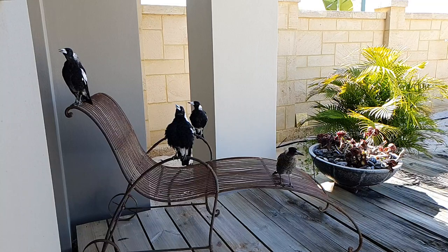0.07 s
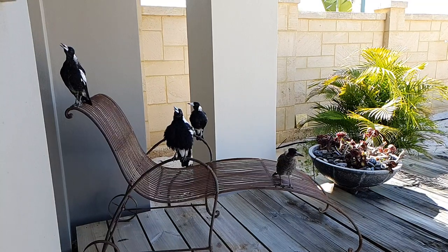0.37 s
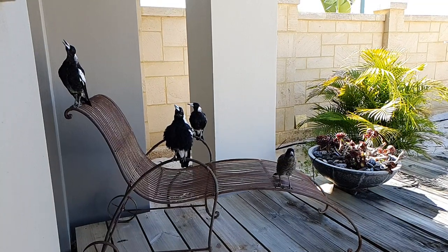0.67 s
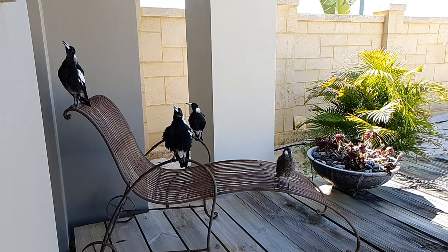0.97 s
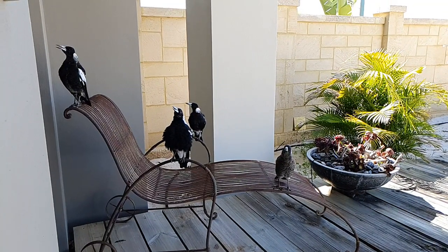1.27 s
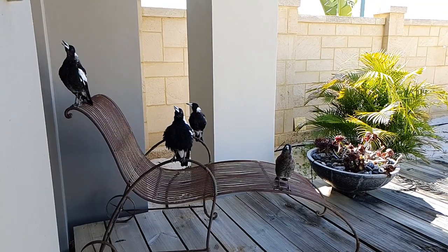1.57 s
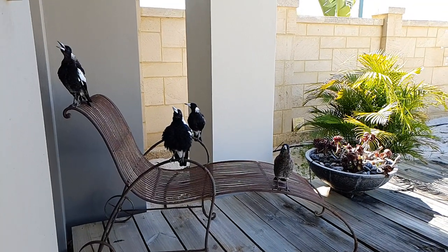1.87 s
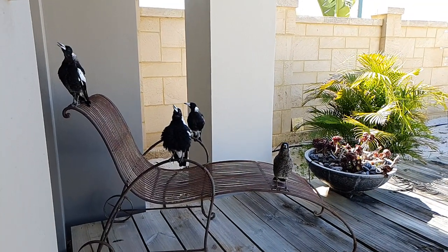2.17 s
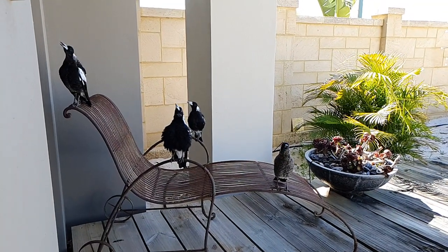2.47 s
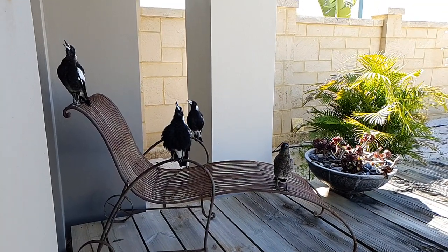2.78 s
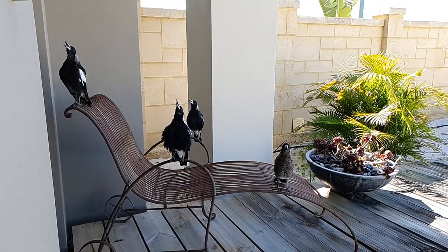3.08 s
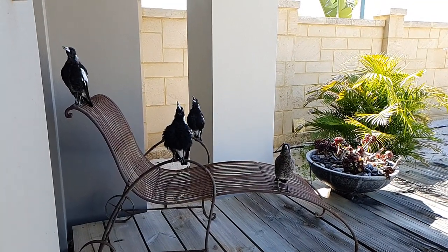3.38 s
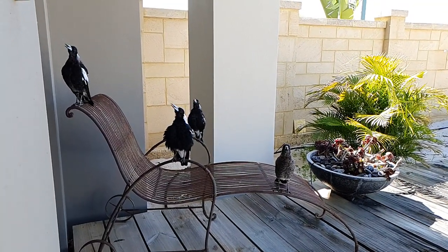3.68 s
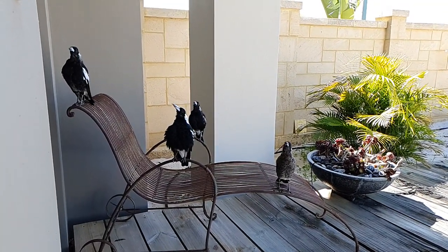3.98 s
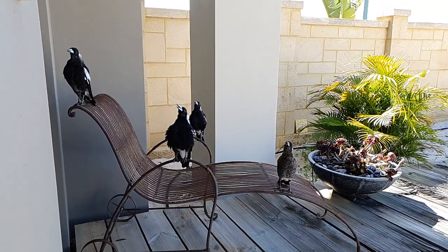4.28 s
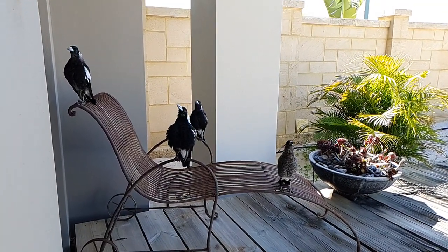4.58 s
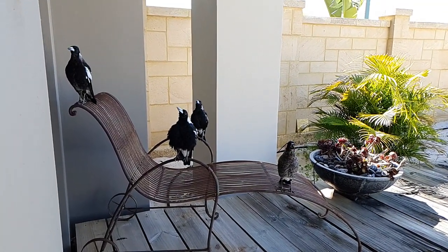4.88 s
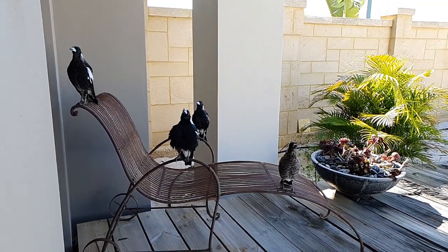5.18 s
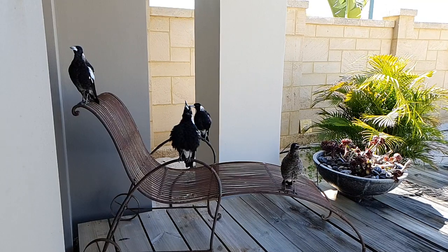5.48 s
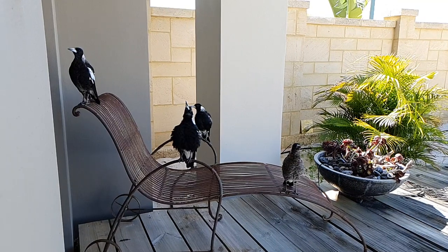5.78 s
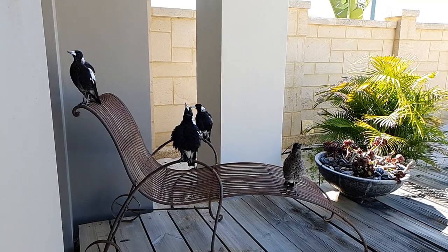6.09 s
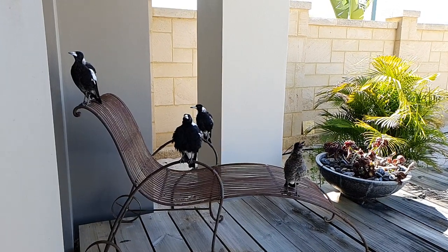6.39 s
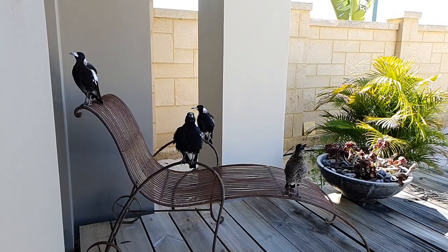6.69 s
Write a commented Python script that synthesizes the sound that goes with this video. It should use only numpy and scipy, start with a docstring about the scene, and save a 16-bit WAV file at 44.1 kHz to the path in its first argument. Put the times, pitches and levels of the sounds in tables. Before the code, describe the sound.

Three magpies warble close by outdoors, trading clear piping notes, buzzing trills and falling carols over a faint low rumble.

```python
"""Three magpies sing on a wooden deck between a house wall and pillars, over a faint outdoor rumble.
First come short clear pipes and buzzing trills: gliding whistles from the syrinx, a bird's voice box.
A soft carol slips in, holding a high tone and then falling in a trill. Near 3 s a throaty crack and
loud pipes lead into two more carols. Near 5 s the right-hand bird joins in fully; three carols follow,
and one pipe ends the song. All along, notes overlap and the deck and walls answer with quick echoes."""
import sys
import numpy as np
from scipy import signal
from scipy.fft import rfft, irfft, next_fast_len
from scipy.io import wavfile
from scipy.ndimage import uniform_filter1d, minimum_filter1d, map_coordinates

SR = 44100
rng = np.random.default_rng(int(sys.argv[2]) if len(sys.argv) > 2 else 0)


def wav_record(signal):
    """Record a signal, one row per channel, as 16-bit PCM in the file named by sys.argv[1]."""
    frames = np.transpose(np.atleast_2d(signal))
    bounded = np.clip(frames, -1, 1)
    # unit amplitude maps onto the largest positive 16-bit level
    quanta = np.round(bounded * 32767).astype(np.int16)
    wavfile.write(sys.argv[1], SR, quanta)


N = 306054
TOP_HZ = 15550  # the highest sound we keep


def magpie(bird, level_db, lead_ms, **tone):
    """One bird sings all its notes; they reach the left ear lead_ms before the right."""
    kinds = (carol, CAROL_NOTES), (trilled, TRILL_NOTES), (pipe, PIPE_NOTES)
    notes = [shape(*row[:-1]) for shape, table in kinds for row in table if row[-1] == bird]
    song = np.zeros((2, N + SR))
    for plan in notes:
        start, sound = syrinx(plan, **tone)
        song[:, start:start + sound.shape[1]] += sound
    early_s = np.array([[1], [-1]]) * lead_ms / 2000
    return amp(level_db) * filtered(song[:, :N], lambda hz: np.exp(2j * np.pi * hz * early_s))


# Carols: (start [s], hold [s], fall [s], top pitch [Hz], end pitch [Hz], glide [exponent],
# hold level [dB], hold trill [0-1], fall level [dB], loudest point of fall [0-1], fall trill [0-1],
# overtones [dB], beak opening [0-1], left over right [dB], bird [name])
CAROL_NOTES = [ (0.421, 0.2, .18, 1412, 1027, 0.23, -41.5, 0.34, -24, 0.53, 1, -26, 0.74, -6, "middle"),
               (2.926, 0.15, 0.29, 1435, 1058, 0.97, -17, 0.2, -6, 0.38, 0.81, -21.5, 0.64, -6.5, "left"),
               (3.416, 0.23, .135, 1409, 968, 0.45, -22, 0.92, -20.5, 0.25, 1, -20, 0.83, -4, "middle"),
               (5.042, .095, .18, 1312, 953.4, .5, -18.5, 0.34, -15, 0.88, 0.49, -28.5, 0.71, 0.5, "right"),
               (5.519, .255, .35, 1396, 1084, .65, -24.5, 0.44, -5.5, .4, 0.63, -19.5, 0.79, -3, "left"),
               (6.395, .095, 0.26, 1383, 1109, .85, -17.5, 0.43, -9, 0.1, .7, -17, 0.68, 0, "right"), ]

def carol(start, hold, fall, top_hz, end_hz, glide, hold_db, hold_trill,
          db, peak, trill, overtones_db, beak, pan_db):
    """Plan a bright held tone that sinks slowly, then breaks into a swelling, falling trill."""
    sag_hz_per_s, break_s = 124.7, .0212
    sag_hz = sag_hz_per_s * hold / 2
    held = breath(start, hold - break_s, top_hz + sag_hz, top_hz - sag_hz, hold_db, .2, hold_trill,
                  overtones_db + 4, beak, pan_db, swell_db=(5.5, 2), glide=1)
    falling = breath(start + hold, fall, top_hz - sag_hz, end_hz, db, peak, trill,
                     overtones_db, beak, pan_db, swell_db=(10, 15.5), glide=glide)
    return slide_in(np.vstack([held, falling]))


# Mostly buzzing notes, plus one loud, nearly clear tone with a nasal ring:
# (start [s], length [s], start pitch [Hz], end pitch [Hz], level [dB], loudest point [0-1],
# trill depth [0-1], overtones [dB], beak opening [0-1], left over right [dB], bird [name])
TRILL_NOTES = [ (0.086, 0.066, 923, 919.4, -15, 0.15, 1, -20, 0.23, -4.5, "left"),
               (0.101, 0.042, 1157, 1304, -20.5, 0.82, 0.76, -29.5, 0.4, -6, "left"),
               (0.369, 0.073, 743, 673, -32, 0.07, 1, -50, 0.1, -3.5, "middle"),
               (0.767, 0.13, 990, 823, -25, 0.77, 0.61, -23.5, 0.45, -7, "middle"),
               (1.131, 0.077, 905, 758, -21.5, 0.84, 0.86, -31, 0.7, -4, "middle"),
               (1.192, 0.15, 752, 718.4, -21, 0.86, 0.75, -34.5, .5, -3.5, "middle"),
               (1.475, 0.12, 884, 820.5, -21.5, 0.59, 0.57, -33, 1, -5.5, "middle"),
               (1.678, 0.28, 1111, 1019, -16, 0.88, 0.69, -10, 0.04, -4, "left"),
               (1.718, 0.079, 1106, 1062, -4, 0.38, 0.07, -22.5, 0, 11.5, "left"),
               (1.979, 0.062, 1333, 1355, -10.5, 0, 1, -25.5, .6, -5, "left"),
               (2.089, 0.056, 1342, 1316, -15, 0.32, 1, -27.5, 0.66, -11, "left"),
               (2.191, .12, 1124, 1057, -6.5, 0.09, 0.92, -19.5, 0.17, -4, "left"),
               (2.312, 0.17, 1065, 1055, -17.5, 0.44, 0.93, -19.5, 0.54, -7, "left"),
               (2.39, 0.29, 997, 731, -12.5, 0.63, 0.52, -22, 0.29, -3.5, "middle"),
               (3.96, 0.12, 793, 697, -23.5, 0.67, 0.7, -32.5, 0.2, -7.5, "left"),
               (4.078, .1, 724.4, 699.7, -20.5, 1, 0.9, -38.5, 0.05, -3.5, "left"),
               (4.167, .27, 827.8, 665.6, -17, 0.13, 0.62, -33, 0.37, -3.5, "middle"),
               (4.475, 0.23, 918, 711, -17, 0.3, 0.69, -31.5, 0.39, -4.5, "left"),
               (4.76, 0.038, 564, 667, -32.5, 0.38, 0.9, -25, 0.9, 2, "right"),
               (4.79, 0.13, 883.5, 916.6, -17, 0.69, 0.75, -24, 0.66, -1, "right"),
               (4.915, 0.042, 1249, 1110, -14.5, 0.44, 0.8, -13.5, 0.53, -6.5, "right"),
               (6.259, 0.081, 1521, 1608, -22.5, 0.06, 0.96, -14, 1, -3, "right"), ]

def trilled(*row):
    """Plan a note whose trill depth sets how much it buzzes."""
    return slide_in(breath(*row, swell_db=(8, 13)))


# Clear notes: (start [s], length [s], start pitch [Hz], end pitch [Hz], level [dB],
# loudest point [0-1], overtones [dB], left over right [dB], bird [name])
PIPE_NOTES = [ (0.175, 0.029, 1065, 1016, -18, 0.28, -31, -1, "right"),
              (0.385, 0.0304, 1245, 1300, -14, .35, -37, -10.5, "middle"),
              (0.414, 0.042, 1453, 1350, -22.5, 0.18, -29, -7, "middle"),
              (0.587, 0.045, 1343, 1204, -20, 0.34, -53, -14, "middle"),
              (0.915, 0.08, 1059, 998, -20.5, 0.64, -32.5, 5, "left"),
              (0.982, 0.058, 991, 950, -23.5, 0.86, -12.5, -23, "left"),
              (1.04, 0.041, 1015, 965, -13.5, 0.26, -44, -3.5, "left"),
              (1.386, 0.041, 1400, 1264, -16, 0.72, -34, -5, "left"),
              (1.616, 0.05, 1470, 1763, -20.5, 0.2, -21.5, -15, "left"),
              (1.649, 0.031, 1353, 1175, -2.5, 0.46, -32, -4.5, "left"),
              (1.95, 0.025, 1256, 1290, -2.5, 0.58, -31, -7, "left"),
              (2.032, 0.03, 715, 622, -30, 0.8, -5.5, -3, "left"),
              (2.065, 0.074, 1218, 1230, -12.5, 0.13, -33, -5.5, "left"),
              (2.126, 0.02, 708, 712, -13.5, 0.6, -20.5, -3.5, "left"),
              (2.169, 0.026, 1164, 1073, -7, .5, -24, -5, "left"),
              (2.738, 0.045, 1495, 1563, -9, 0.4, -30.5, -18, "left"),
              (2.783, 0.059, 1780, 1717, -7.5, .12, -21.5, -11, "left"),
              (2.848, 0.027, 1630, 1439, 1.5, 0.97, -24, -5.5, "left"),
              (2.883, .04, 1327, 1364, 0, 0.5, -21, 3.5, "left"),
              (2.916, 0.2, 1198, 1095, -13, 0, -16.5, -6, "left"),
              (3.438, 0.038, 1476, 1408, -12.5, 0.27, -25, -13, "middle"),
              (3.47, 0.2, 1167, 920, -28.5, 0.72, -17, -5, "middle"),
              (4.389, 0.054, 1370, 1270, -15.5, 0.66, -27.5, -1.5, "left"),
              (4.447, 0.013, 1396, 1710, -23.5, 0.64, -40, -4, "left"),
              (4.947, 0.05, 1312, 1400, -11, 0.52, -17.5, 0.5, "right"),
              (4.996, .036, 1500, 1437, -10.5, .35, -23, -9.5, "right"),
              (5.065, 0.16, 1190, 1062, -17.5, 0.33, -18.5, -8, "right"),
              (5.405, 0.029, 1518, 1436, -11.5, 0.7, -36, 6, "left"),
              (5.456, 0.029, 1687, 1640, -11.5, 0.42, -34, -10, "left"),
              (5.487, .028, 1503, 1424, -14, 0.45, -24.5, 7, "left"),
              (5.519, 0.14, 1312, 1125, -14.5, 0, -23.5, -2.5, "middle"),
              (5.659, 0.12, 1088, 1050, -17, 0.31, -33, -6.5, "middle"),
              (6.24, 0.02, 1510, 1497, -17, 0.7, -25, -11, "right"),
              (6.311, 0.024, 1571, 1430, -8.5, 0.83, -20.5, -4, "right"),
              (6.336, 0.048, 1345, 1279, -6.5, 0.87, -23.5, -3, "right"),
              (6.39, 0.097, 1183, 1090, -16.5, 0.22, -22, -12, "right"),
              (6.833, 0.15, 1028, 923, -17, 0.79, -21.5, 0, "right"), ]

def pipe(start, length, from_hz, to_hz, db, peak, overtones_db, pan_db):
    """Plan a clear, flute-like note with only a slight flutter."""
    return breath(start, length, from_hz, to_hz, db, peak, trill=.15, overtones_db=overtones_db,
                  beak=.71, pan_db=pan_db, swell_db=(15.5, 18))


def breath(start, length, from_hz, to_hz, db, peak, trill, overtones_db, beak, pan_db,
           swell_db, glide=.8, steps=61):
    """Plan one push of air: the pitch glides while the level rises, then falls, by the two swell_db."""
    progress = np.linspace(0, 1, steps)
    pitch = from_hz + (to_hz - from_hz) * progress ** glide  # glide under 1 moves fastest at first
    from_peak = np.interp(progress, [0, np.clip(peak, .02, .98), 1], [-1, 0, 1])
    weak_db = np.where(from_peak < 0, *swell_db) * np.abs(from_peak) ** 1.24  # 1 is pointed, 2 round
    depth = trill + .0145 * (weak_db - weak_db.mean())  # the trill deepens as the breath weakens
    bright_db = overtones_db + .13 * weak_db  # overtones swell less than the whistle
    return np.column_stack([start + length * progress, pitch, db - weak_db, depth, bright_db,
                            np.full(steps, beak), np.full(steps, pan_db)])


def slide_in(plan, flat_share=.07, slide_s=.01505, weak_db=1.5, attack_s=.013):
    """The note starts a little low and weak while the air pressure builds."""
    times, pitch, db, *rest = plan.T
    age = times - times[0]
    pitch = pitch * (1 - flat_share * np.exp(-age / slide_s))
    db = db - weak_db * np.exp(-age / attack_s)
    return np.column_stack([times, pitch, db, *rest])


# Higher notes trill faster: (pitch [Hz], pulse rate [1/s])
TRILL_RATES = [(700, 68), (800, 84), (900, 102), (1150, 105), (1400, 110)]

def syrinx(plan, chop, swing, rasp, voice):
    """The voice box turns a plan into a whistle with overtones, pulsed by a slower vibration."""
    times, *columns = plan.T
    t = np.arange(times[0] - .006, times[-1] + .01, 1 / SR)
    pitch, db, trill, overtones_db, beak, pan_db = (np.interp(t, times, c) for c in columns)
    trill, opening, size = np.clip(trill, 0, 1), np.clip(beak, 0, 1), len(t)
    # The slow vibration squeezes the air into slightly uneven pulses; chop sets how deep they are.
    pulse_hz = along(TRILL_RATES, pitch) * (1 + .04 * wobble(61, size))
    beat = 2 * np.pi * np.cumsum(pulse_hz) / SR
    pulses = lambda depth: np.exp(depth * np.cos(beat)) / np.sqrt(np.i0(2 * depth))
    waver = (.05 + .24 * trill) * wobble(60, size)
    phase = 2 * np.pi * np.cumsum(pitch) / SR + waver
    # Every pulse also bends the pitch; swing sets how far.
    bend = trill * (swing * np.sin(beat + 1.836) + .025 * wobble(600, size))
    whistle = np.sqrt(2) * np.cos(phase + bend) * pulses(chop * trill)
    # Trills sung with an open beak, and low trills, have rougher, hoarser overtones.
    lowness = np.clip((1020 - pitch) / 80, 0, 1)
    hoarse = .012 + 1.4 * (.07 + .24 * opening + .22 * lowness) * trill
    closing = phase + (.4 + .9 * opening) * bend + hoarse * wobble(400, size)
    multiples = range(2, int(TOP_HZ / pitch.mean()) + 2)
    buzz = unit(sum(np.cos(k * closing + rng.uniform(0, 2 * np.pi)) for k in multiples))
    hiss_share = np.clip(.02 + rasp * trill ** 2, 0, 1)
    raspy = np.sqrt(1 - hiss_share) * buzz + np.sqrt(hiss_share) * rng.standard_normal(size)
    overtones = throat(raspy * pulses(.66 * trill), opening, voice)
    ears = lambda left_db: np.sqrt(2 / (1 + amp([-2 * left_db, 2 * left_db])))
    sound = whistle * ears(pan_db) + amp(overtones_db) * overtones * ears(.3 * pan_db - 2)
    flicker_db = 4 * trill * wobble(130.55, size)
    from_edge_s = np.minimum(t - t[0], t[-1] - t)
    fade = np.sin(np.pi / 2 * np.clip(from_edge_s / .011, 0, 1)) ** 2
    return round(t[0] * SR), sound * amp(db + flicker_db) * fade


# The nasal ring of an almost shut beak: (frequency [Hz], level [dB])
SHUT_BEAK_RING = [(2000, -13.5), (2700, -10.5), (3000, -4), (3200, 1.5), (3500, -4.5), (3750, -19),
                  (5200, -32.5), (8000, -19.5), (10500, -29.5), (11700, -19.5), (15300, -28.5)]
# The ring of a wide open beak: (frequency [Hz], level [dB])
OPEN_BEAK_RING = [(1500, 12.5), (2600, 2), (3000, -11), (3400, 0), (4500, -5), (5300, -1), (6400, -8.5),
                  (8100, -6), (10200, -19), (11700, -8.5), (12700, -19), (15300, -26.5)]

def throat(x, opening, voice):
    """Throat and beak colour the overtones; a higher voice raises the nasal ring, as in a smaller bird."""
    def ring(beak, scale):
        return unit(filtered(x, lambda hz: amp(along(beak, hz / scale)) * bass_cut(hz, 1500)))
    return unit((1 - opening) * ring(SHUT_BEAK_RING, voice) + opening * ring(OPEN_BEAK_RING, .99))


# Throaty cracks as a bird leaps to a high note: (time [s], level [dB])
VOICE_CRACKS = [(0.377, -58), (2.777, -18.5), (4.931, -39), (5.438, -27), (6.271, -25)]

def cracks(centre_hz=1600, width=.18, rise_s=.011):
    """The voice shakes wildly for a moment before the tone locks in."""
    t = np.arange(N) / SR
    ages = ((np.maximum(t - start, 0) / rise_s, db) for start, db in VOICE_CRACKS)
    bursts = sum(amp(db) * age * np.exp(1 - age) for age, db in ages)
    band = lambda hz: bass_cut(hz, 600) / (1 + (np.log((hz + 1) / centre_hz) / width) ** 2)
    return bursts * unit(filtered(rng.standard_normal(N), band)) * amp([[-2], [1]])


# Echoes off deck, pillars and wall: (left delay [s], right delay [s], level [dB])
PORCH_ECHOES = [(.0037, .0043, -14), (.0079, 0.006, -7.5), (0.0123, .0134, -3), (0.0204, 0.019, -11)]
# How long the porch rings: (frequency [Hz], time to fade by 60 dB [s])
PORCH_RING = [(300, 0.32), (1100, 0.55), (3500, 0.32), (8000, 0.25), (15000, 0.28)]

def porch(x, tail_db):
    """Deck, pillars and wall throw back quick echoes, then a short blurred tail."""
    hz, t, noise = signal.stft(rng.standard_normal((2, SR // 2)), SR, nperseg=256)
    decay = amp(-60 * t / along(PORCH_RING, hz)[:, None])
    build_up = 1 - np.exp(-t / .0053)
    # Raised beaks beam the overtones at the walls, so the tail is brighter than the direct sound.
    colour = amp(along([(1500, .0032), (4000, 3)], hz))[:, None]
    tail = signal.istft(noise * decay * build_up * colour, SR, nperseg=256)[1]
    answer = amp(tail_db) * tail / np.linalg.norm(tail[0])
    for left_s, right_s, db in PORCH_ECHOES:
        answer[[0, 1], [int(left_s * SR), int(right_s * SR)]] += amp(db)
    return signal.fftconvolve(x, answer, axes=1)[:, :N]


# The colour of the outdoor rumble: (frequency [Hz], relative level [dB])
RUMBLE_COLOUR = [(20, -35), (55, 2), (110, -2), (140, -8.5), (190, -1.5), (260, -13), (450, -18.5),
                 (1000, -6), (3000, -36), (15000, -67)]
# How alike it sounds in both ears: (frequency [Hz], likeness [0-1])
RUMBLE_LIKENESS = [(60, 0.99), (200, 0.89), (2000, 0.06)]

def outdoors(level_db):
    """A low, far rumble with a trace of hiss; it eases off in the first seconds."""
    def colour(hz):
        spread = np.arccos(along(RUMBLE_LIKENESS, hz)) / 2
        return amp(along(RUMBLE_COLOUR, hz)) * [np.cos(spread), np.sin(spread)]
    shared, opposite = filtered(rng.standard_normal((2, N)), colour)
    ease_db = np.interp(np.arange(N) / SR, [1.3, 3.5], [3.5, 0])
    return amp(level_db + ease_db) * unit(np.array([shared + opposite, shared - opposite]))


def amp(db):
    """Turn decibels into a number to multiply by."""
    return 10 ** (np.asarray(db) / 20)


def unit(x):
    """Scale a sound to an average strength (rms) of 1."""
    return x / np.sqrt(np.mean(x ** 2) + 1e-20)


def along(points, hz):
    """Read between (frequency, value) points, with octaves evenly spaced."""
    point_hz, values = np.transpose(points)
    return np.interp(np.log(hz + 1), np.log(point_hz + 1), values)


def wobble(rate, size):
    """A smooth random curve through rate points a second."""
    return map_coordinates(rng.standard_normal(SR // 4), [np.arange(size) * rate / SR], mode="wrap")


def bass_cut(hz, corner_hz):
    """A filter curve that turns down everything below corner_hz."""
    return hz ** 4 / (hz ** 4 + corner_hz ** 4)


def filtered(x, response):
    """Multiply each frequency in x by response(hz)."""
    size = x.shape[-1]
    padded = next_fast_len(size + 4096)
    return irfft(rfft(x, padded) * response(np.fft.rfftfreq(padded, 1 / SR)), padded)[..., :size]


def scene():
    """Three birds, their echoes and the outdoor rumble."""
    birds = magpie("left", level_db=-4.5, lead_ms=.21, chop=.68, swing=.93, rasp=.1, voice=.98)
    birds += magpie("middle", level_db=-1.23, lead_ms=.088, chop=.64, swing=1.08, rasp=.18, voice=1.034)
    birds += magpie("right", level_db=-3, lead_ms=-.062, chop=.83, swing=1.31, rasp=.18, voice=1.036)
    birds += cracks()
    return birds + porch(birds, tail_db=-4.5) + outdoors(level_db=-47)


def record(dry):
    """Sound starts after a tenth of a second; loud peaks are turned down and the top treble is cut."""
    fade_in = np.clip((np.arange(N) / SR - .101) / .002, 0, 1)
    safe_gain = np.minimum(1, .9 / (np.abs(dry).max(0) + 1e-9))
    smooth_gain = uniform_filter1d(minimum_filter1d(safe_gain, size=400), size=300)
    return filtered(dry * smooth_gain * fade_in, lambda hz: 1 / (1 + (hz / TOP_HZ) ** 200))


dry = scene()
out = record(dry)
wav_record(out)
```